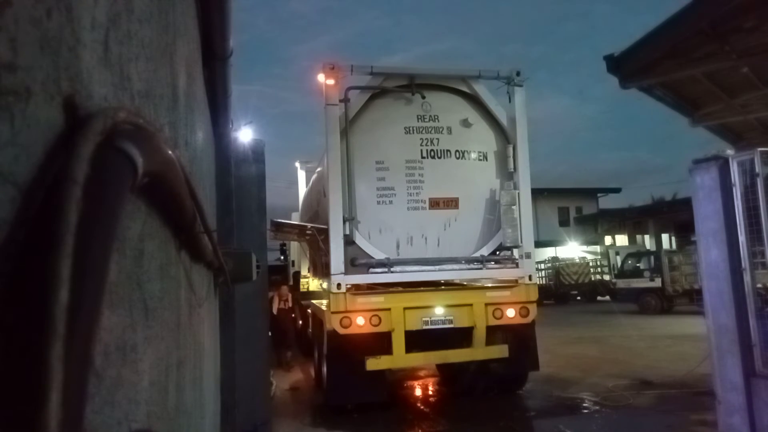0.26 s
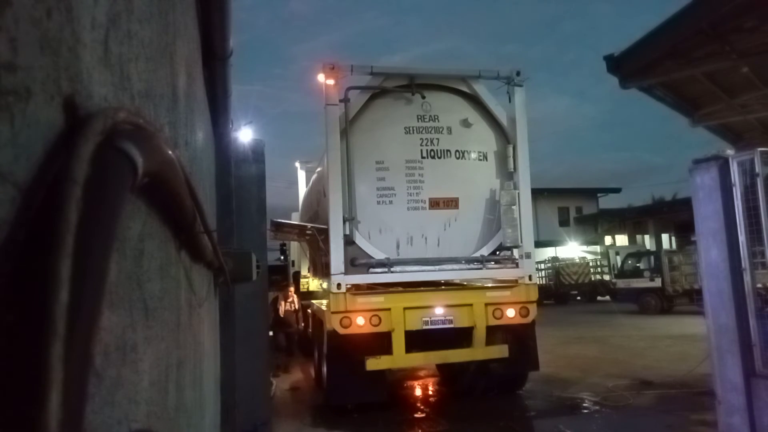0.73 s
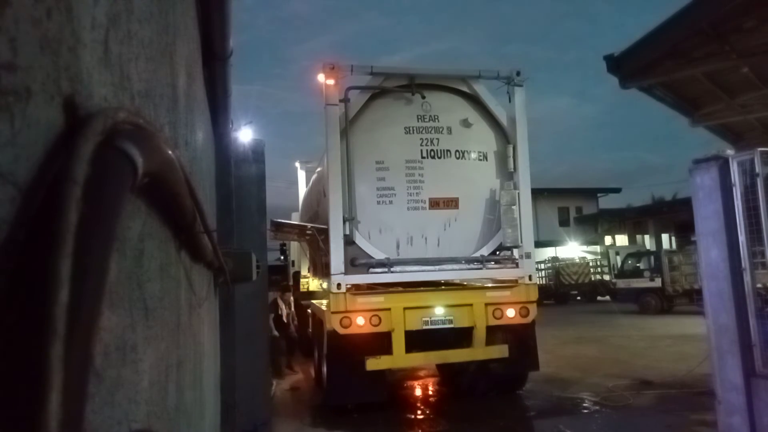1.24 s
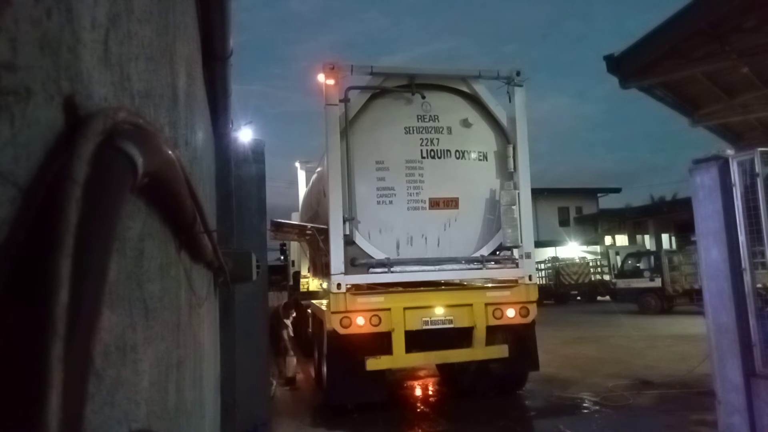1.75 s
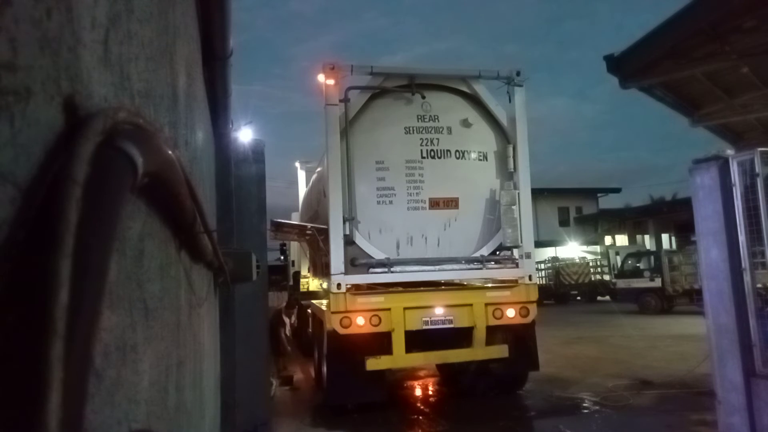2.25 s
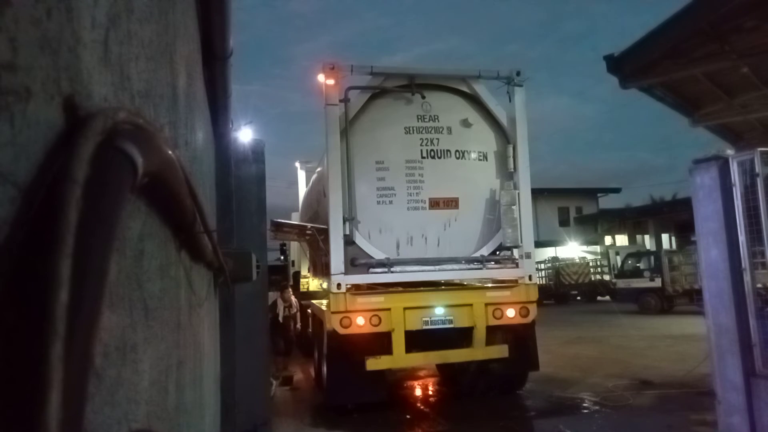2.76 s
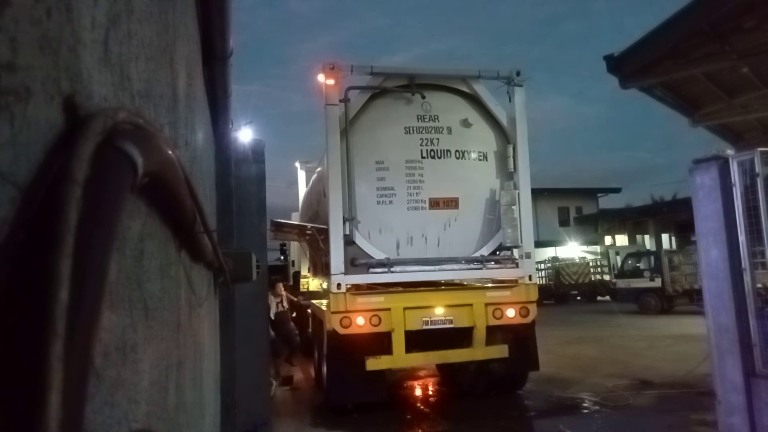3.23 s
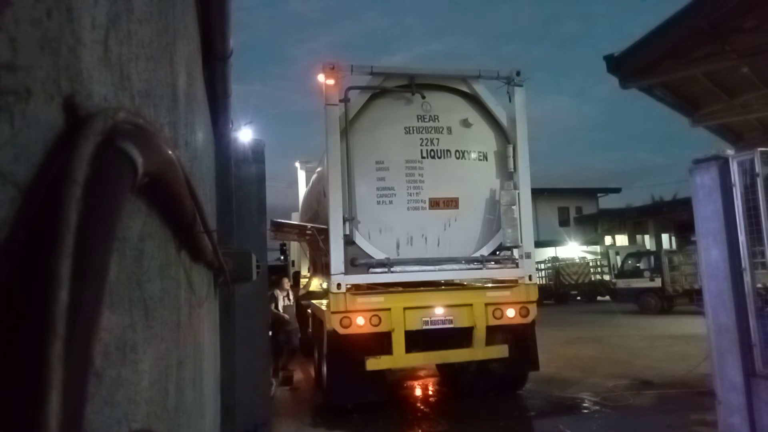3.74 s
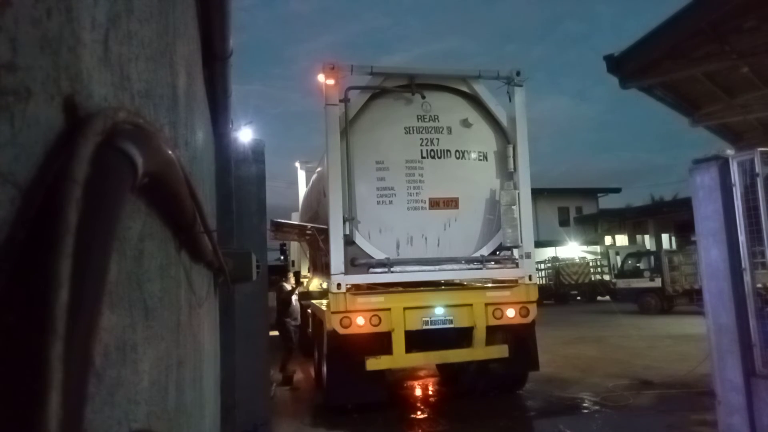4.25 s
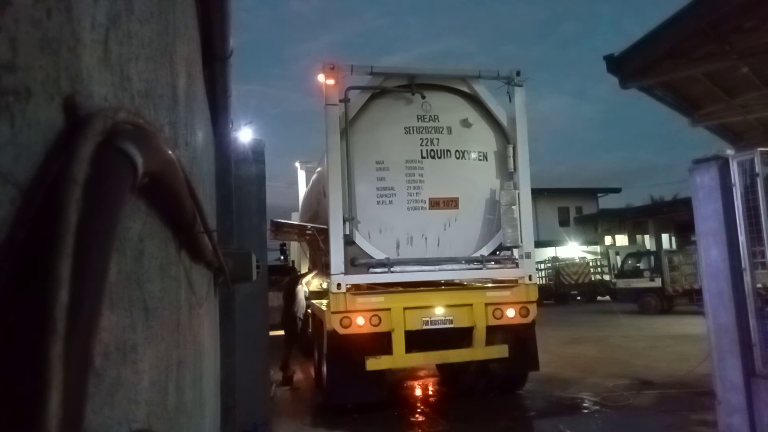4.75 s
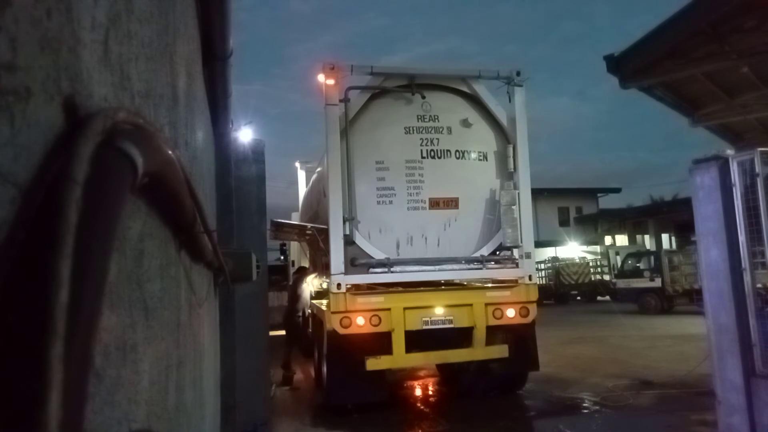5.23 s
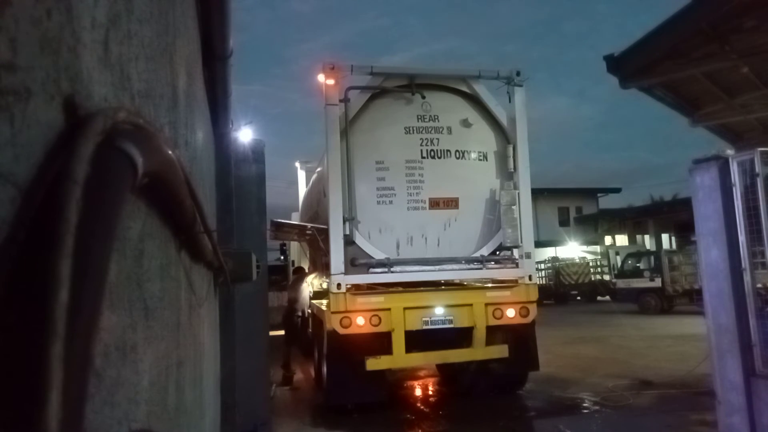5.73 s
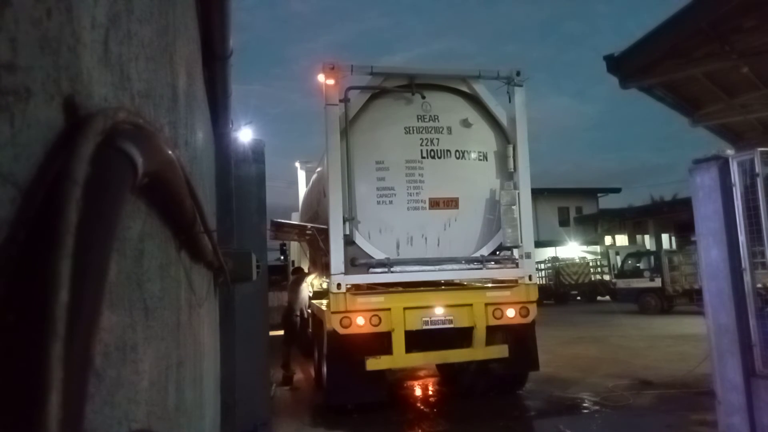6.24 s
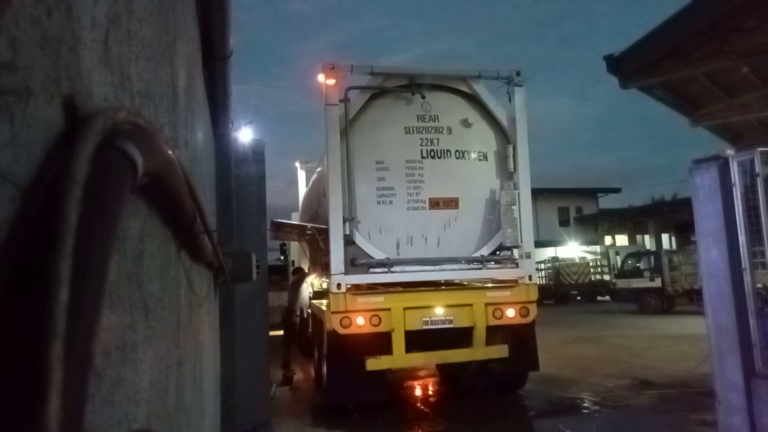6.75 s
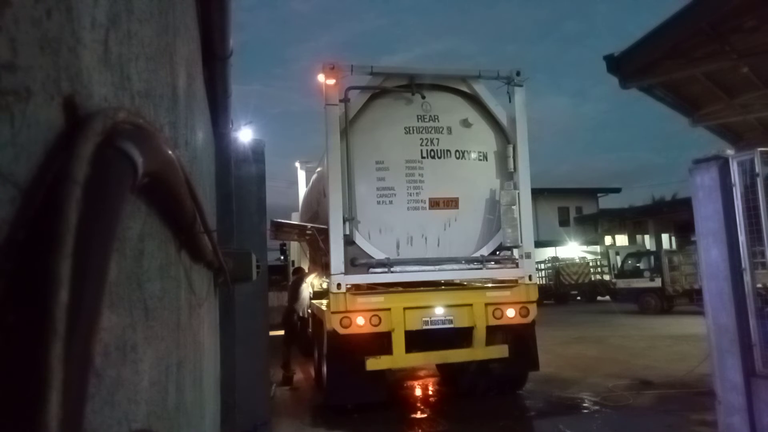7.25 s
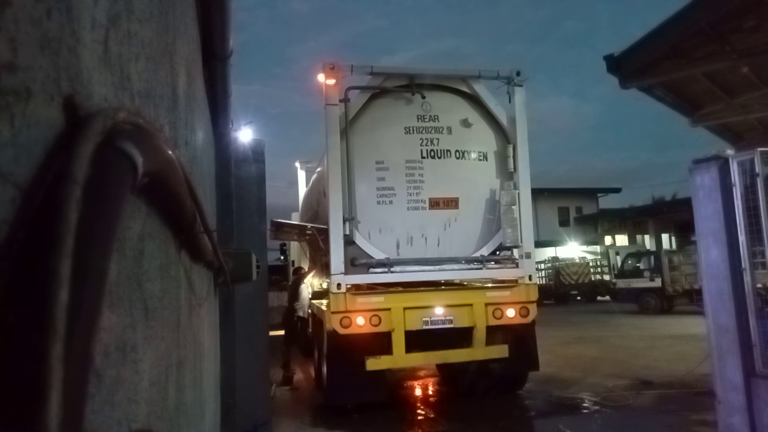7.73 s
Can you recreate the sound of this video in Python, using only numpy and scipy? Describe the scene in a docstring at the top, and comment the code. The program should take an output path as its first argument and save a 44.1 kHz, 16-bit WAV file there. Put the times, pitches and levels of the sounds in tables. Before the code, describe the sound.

A quiet industrial yard: distant machines give a low, slightly wavering hum with faint steady tones, soft airy wash and one thin, high fan whine. At about 1.75 s a dull double knock lands on a heavy panel, boxy and rattling; a stronger, brighter cluster follows at 2.35 to 2.5 s. Near 3.3 s comes a small, bright metal clink, and at 3.75 s a very faint low bump. The hum continues alone until 5.46 s, when a valve chirps, a stuttering high squeak rising within a tenth of a second. Immediately loud gas hisses out, with hollow pipe resonances, a sinking breathy note and a whistling edge. At 6.0 s the tones thin. Around 6.6 s a thud brings a lumpy, swelling low rumble beneath the hiss. At 7.1 s the rumble collapses and a broad, full roar holds until the end, with short yard echo.

```python
"""Tank vent in a machine yard

Distant machines hum, as coloured noise, wavering tones and noise-driven resonances, with one far fan.
Dull knocks ring a heavy panel's modes through a rattle, and a metal fitting clinks as crack and ring.
A valve then squeaks open on a rising note, and noise hisses through resonances of pipe and valve seat.
As the valve opens in steps, the hiss gives way to a broad roar over a thud and a lumpy low rumble.
"""
import sys
import numpy as np
from scipy import signal
from scipy.fft import rfft, irfft, next_fast_len
from scipy.io import wavfile

SR = 44100
rng = np.random.default_rng(int(sys.argv[2]) if len(sys.argv) > 2 else 0)


def file_out(sig):
    """Save sig as 16-bit WAV at sys.argv[1]."""
    # one column per channel
    cols = np.atleast_2d(sig).T
    # limit, then scale
    lim = np.clip(cols, -1, 1)
    pcm = np.round(lim * 32767).astype(np.int16)
    wavfile.write(sys.argv[1], SR, pcm)


N = 352359
T = np.arange(N) / SR  # the time of every sample, in seconds

# The yard's wash. Each row: frequency in Hz, relative density in dB per Hz.
YARD_SPECTRUM = [(15, -63), (25, -47.5), (98, 1), (162, -9), (207, -4), (231, -15.5), (307, -12.5),
                 (418, -14.5), (621, -18.5), (663, -16.5), (922, -14), (1280, -22.5), (3450, -26),
                 (3770, -28.5), (4800, -44.5), (6240, -78), (10600, -120)]
# The yard's high air. Each row: frequency in Hz, relative density in dB per Hz.
AIR_SPECTRUM = [(4000, -36), (5100, -22.5), (5650, -9), (6200, -14), (7250, 1), (8300, -11), (9400, -15),
                (10300, -9), (11500, -18), (15000, -11)]
YARD_DB, AIR_DB = -39.5, -57
# The machines' steady tones. Each row: pitch in Hz, level in dB before the common hum level.
HUM_TONES = [(91.5, -54.5), (199, -54), (312, -55), (624.5, -54.5), (861, -61), (1087, -53.5),
             (1217, -58.5), (2428, -65), (3666, -67), (3698, -60), (4420, -73), (7226, -68.5), (7880, -73),
             (8320, -78)]
# Fans and ducts around the yard. Each row: pitch in Hz and width in Hz before the common factors,
# relative density in dB.
WHINE_MODES = [(378, 24, 2), (894, 73, -1.5), (1094, 27, -1), (1675, 340, -4.5), (2480, 85, -4),
               (2660, 86, -1.5), (3114, 88, -5), (4434, 87, -13), (7060, 60, -25), (7680, 60, -17),
               (10300, 70, -26)]
# The most piercing fan.
FAN_HZ, FAN_DB = 3730, -64.5

# Blows on a heavy panel. Each row: start in seconds, first peak in dB before the band limit,
# brightness of the first contact in Hz, change per rebound in dB.
KNOCKS = [(1.754, -9.5, 252, -6.5), (1.803, -20, 230, -10), (2.352, -7.5, 460, -18),
          (2.369, -7.5, 700, -5.5), (2.456, -19.5, 680, -6.5), (2.52, -26, 450, -3), (3.743, -30, 110, -12),
          (3.776, -26, 110, -18)]
# The panel's modes. Each row: pitch in Hz, relative level in dB, time to fall 60 dB in seconds.
PANEL_MODES = [(120.8, -15, 0.25), (148.3, -3.5, 0.18), (195, -1, 0.063), (211, 5, 0.059), (263, -6, 0.091),
               (350, -1.5, 0.05), (440, -4, 0.1), (500, -6, 0.16), (620, -9.5, 0.13), (750, -12, 0.11),
               (867, -14, 0.11), (1360, -19, 0.082), (1550, -19, 0.086)]
# The panel chatters after a blow: seconds between rebounds, brightness factor per rebound.
REBOUND_S, REBOUND_BRIGHTER = 0.0162, 1.1

# A metal fitting clinks. The row: start in seconds, overall gain in dB.
CLINK = (3.282, -33)
# The fitting's modes. Each row: pitch in Hz, relative level in dB, time to fall 60 dB in seconds.
FITTING_MODES = [(2330, -11, .25), (2568, -2, .45), (2620, 0.5, .41), (2720, -5, .35), (2955, -10, 0.55),
                 (3470, -11, 0.2), (6720, -8, .22), (6790, -7, 0.35), (8450, -14, 0.2), (9390, -13, .2),
                 (13600, -21, .15)]
# The crack of its contact. Each row: frequency in Hz, relative density in dB per Hz.
CRACK_SPECTRUM = [(1200, -32), (2400, 4), (3600, -4), (5000, -24), (6700, -6), (9000, -22), (11500, -27),
                  (14000, -22)]

# The valve squeaks as it cracks open. Each row: start in seconds, length in seconds,
# level in dB before flutter and reflections.
SQUEAKS = [(5.464, .004, -32), (5.476, 0.0069, -17.5), (5.491, 0.015, -22.5), (5.516, 0.076, -23)]
SQUEAK_ATTACK_S, SQUEAK_RELEASE_S = 0.0016, 0.0052
# The pitch climbs exponentially; the last value is the time constant.
SQUEAK_FROM_HZ, SQUEAK_TO_HZ, SQUEAK_CLIMB_S = 2830, 3220, 0.0222

# The valve opens in steps. Each row: start in seconds, time the step takes in seconds, flow in dB,
# trend of the flow in dB per second, pipe ringing in dB, seat whistle in dB, share of roar from 0 to 1.
STEPS = [(5.49, 0.11, -14.5, -2, -3.5, -0.5, 0.01), (6.02, .06, -13, 1.5, -14, -4.5, 0.03),
         (6.56, 0.09, -15, -1.5, -23, -14, 0.18), (7.13, 0.076, -13.4, -2, -13.5, -14, 0.99)]
# Trend of the pipe ringing and of the seat whistle after each step.
PIPE_SETTLE_DB_PER_S, SEAT_SETTLE_DB_PER_S = -5, -13
# The narrow jet. Each row: frequency in Hz, relative density in dB per Hz.
HISS_SPECTRUM = [(70, -48), (210, -10), (340, -17), (480, -6.5), (1300, -11.5), (1950, 1), (2220, -0.5),
                 (3100, 0.5), (4000, -6), (4900, -17), (5900, -16), (7250, -1.5), (8300, -13.5),
                 (10500, -21), (13000, -19.5), (15200, -14)]
# The wide jet. Each row: frequency in Hz, relative density in dB per Hz.
ROAR_SPECTRUM = [(40, -30), (140, -1.5), (1000, -1), (2200, -0.5), (3200, -0.5), (4000, -8), (4900, -21.5),
                 (6000, -19.5), (7250, -8), (8300, -16.5), (10500, -21.5), (13000, -20.5), (15200, -15)]
# The vent pipe's resonances. Each row: pitch in Hz before chilling, width in Hz before widening,
# relative density in dB.
PIPE_MODES = [(224, 33, -2.5), (509, 62, -4.5), (761, 31, -0.5), (975, 53, 3), (1196, 46, 1.5),
              (1424, 91, 2.5), (1706, 50, 2), (2040, 46, -0.5)]
# The valve seat's resonances. Each row: pitch in Hz, width in Hz before widening, relative density in dB.
SEAT_MODES = [(1727, 30, -17), (2513, 27, -4), (2545, 72, -4), (2858, 49, -6.5), (3030, 40, -9.5),
              (3210, 48, -10.5), (3746, 20, -11), (3800, 40, -13.5), (4110, 23, -13.5), (7170, 25, -11),
              (7260, 32, -11.5), (7460, 35, -15)]
# Cold gas chills the pipe: time constant in seconds, pitch factors when warm and when cold.
CHILL_S, PIPE_WARM, PIPE_COLD = 0.29, 1.02, 0.96
# The pipe's strongest note: pitch warm and cold, level, build-up, change of level at the second step.
HOWL_WARM_HZ, HOWL_COLD_HZ, HOWL_DB, HOWL_BUILD_S, HOWL_DROP_DB = 511, 412, -23, 0.32, -19

# The plume's eddies. Each row: frequency in Hz, relative density in dB per Hz.
EDDY_SPECTRUM = [(25, -44), (60, -13), (110, -0.5), (240, 0.5), (420, -1.5), (900, -5), (1450, -9.5),
                 (3000, -29.5)]
# Start, collapse, attack and release of the rumble.
PLUME_S, COLLAPSE_S, PLUME_ATTACK_S, PLUME_RELEASE_S = 6.58, 7.13, 0.045, 0.26
# First level, swell, level after the collapse.
PLUME_DB, PLUME_SWELL_DB_PER_S, PLUME_LATE_DB = -17.5, 5, -28
# The plume bursts out with a thud. The row: start in seconds, level in dB.
THUD = (6.607, -8)

# Ground, wall and tank reflect the vent. Each row: delay in seconds, level in dB against the direct sound.
REFLECTIONS = [(.0043, -30), (0.0118, -19), (0.0194, -19.5), (.031, -21)]
# The yard's echo. Each row: frequency in Hz, time to fall 60 dB in seconds.
ECHO_DECAY = [(100, 0.52), (400, 0.57), (1000, 0.96), (3000, 0.6), (8000, 0.47), (15000, 0.52)]
EDGE_HZ = 15560  # upper band limit


def gain_of(db):
    """Decibels to an amplitude factor."""
    return 10 ** (np.asarray(db) / 20)


def evened(x):
    """Scales to rms 1."""
    return x / np.sqrt(np.mean(x ** 2) + 1e-20)


def read(points, hz):
    """Reads a table of values over frequency, interpolating on a log-frequency axis."""
    f, value = np.transpose(points)
    return np.interp(np.log(hz + 1), np.log(f + 1), value)


def add(mix, s, sound):
    """Lays a sound into the mix at time s, cut off at the mix's end."""
    part = mix[round(s * SR):][:len(sound)]
    part += sound[:len(part)]


def ramp(start_s, length_s):
    """Rises from 0 to 1 over the given time, then holds."""
    return np.clip((T - start_s) / length_s, 0, 1)


def since(s):
    """Seconds gone by since time s; zero before it."""
    return np.maximum(T - s, 0)


def noise(spectrum, above_hz=0):
    """Coloured noise whose part over above_hz has rms 1."""
    size = next_fast_len(N)
    hz = np.fft.rfftfreq(size, 1 / SR)
    coloured = rfft(rng.standard_normal(size)) * gain_of(read(spectrum, hz))
    reference = irfft(coloured * (hz >= above_hz), size)
    return irfft(coloured, size)[:N] / np.std(reference)


def drift(rate_hz):
    """Slow chance of rms 1: sines of random phase at rates up to the given one."""
    t = T[::64]
    waves = 0
    for f in np.geomspace(rate_hz / 16, rate_hz, 32):
        waves = waves + np.sin(2 * np.pi * (f * t + rng.random())) / f ** 0.25
    return np.interp(T, t, evened(waves))


def resonate(x, hz, width):
    """A resonance of gain 1 that follows the curve hz, with the steep skirts of a double pole."""
    turn = np.exp(2j * np.pi * np.cumsum(hz * np.ones(N)) / SR)
    r = np.exp(-np.pi * width / SR)
    # shift the resonance down to 0 Hz, smooth there, shift back up
    smooth = signal.lfilter([(1 - r) ** 2], [1, -2 * r, r * r], x / turn)
    return 2 * (turn * smooth).real


def blown(modes, pitch, widen):
    """Turbulence excites a set of resonances, all bent by one pitch factor; the sum has rms 1."""
    total = 0
    for hz, width, db in modes:
        mode = evened(resonate(rng.standard_normal(N), hz * pitch, width * widen))
        total = total + gain_of(db) * np.sqrt(width) * mode
    return evened(total)


def ring(modes, t):
    """Struck modes, each dying at its own speed."""
    return sum(gain_of(db - 60 * t / t60) * np.sin(2 * np.pi * hz * t) for hz, db, t60 in modes)


def echo(x, build_s):
    """Scattered reflections from walls and tanks build up, then die band by band."""
    t = np.arange(SR) / SR
    hits = rng.standard_normal(SR) * (rng.random(SR) < 3000 / SR)  # about 3000 per second
    taps = hits * (1 - np.exp(-t / build_s))
    hz, s, bands = signal.stft(taps, SR, nperseg=256)
    bands = bands * gain_of(-60 * s / read(ECHO_DECAY, hz)[:, None])
    tail = signal.istft(bands, SR, nperseg=256)[1]
    return signal.fftconvolve(x, tail / np.linalg.norm(tail))[:N]


def reflected(x):
    """Single early reflections comb the sound; the total power stays the same."""
    out = x.copy()
    for delay, db in REFLECTIONS:
        add(out, delay, gain_of(db) * x)
    return out * np.std(x) / np.std(out)


def yard(rumble_hz=102, rumble_width_hz=50, rumble_db=-46, hum_db=-3, whine_db=-49,
         waver_hz=2.53, swell_db=0.35, flicker_db=2.5):
    """Distant machines: a wash, a low throb, wavering tones and whining fans."""
    wash = gain_of(YARD_DB + swell_db * drift(6.8)) * noise(YARD_SPECTRUM)
    air = gain_of(AIR_DB) * noise(AIR_SPECTRUM)
    rumble = evened(resonate(rng.standard_normal(N), rumble_hz, rumble_width_hz))
    tones = 0
    for hz, db in HUM_TONES:
        level = gain_of(db + flicker_db * drift(5.6))
        phase = 2 * np.pi * np.cumsum(hz + waver_hz * drift(9)) / SR
        tones = tones + level * np.sin(phase)
    hum = gain_of(hum_db) * np.sqrt(2) * tones
    whine = gain_of(whine_db) * blown(WHINE_MODES, 0.98, widen=1.26)
    return wash + air + gain_of(rumble_db) * rumble + hum + whine


def fan(width_hz=42, swell_db=3, swell_hz=2.44):
    """One far fan whines as a narrow band of noise, swelling and sinking at random."""
    whine = evened(resonate(rng.standard_normal(N), FAN_HZ, width_hz))
    return gain_of(FAN_DB + swell_db * drift(swell_hz)) * whine


def knocks(rattle_db=8, rattle_t60=0.28, wet_db=-7, lowest_hz=88, highest_hz=1900, swell_s=0.0032, count=4):
    """Each blow rings and rattles the panel, then rebounds weaker and brighter; dull contact mutes high modes."""
    t, out = np.arange(SR // 2) / SR, np.zeros(N)
    # the thick panel radiates neither deep bass nor treble
    radiate = signal.butter(3, [lowest_hz, highest_hz], "band", fs=SR, output="sos")
    for s, db, bright_hz, rebound_db in KNOCKS:
        for k in range(count):
            rattle = gain_of(rattle_db - 60 * t / rattle_t60) * rng.standard_normal(len(t))
            motion = (ring(PANEL_MODES, t) + rattle) * (1 - np.exp(-t / swell_s))
            contact = signal.butter(3, bright_hz * REBOUND_BRIGHTER ** k, fs=SR, output="sos")
            blow = signal.sosfilt(radiate, signal.sosfilt(contact, motion))
            add(out, s + k * REBOUND_S, gain_of(db + k * rebound_db) * blow / abs(blow).max())
    return out + gain_of(wet_db) * echo(out, 0.011)


def clink(crack_db=-1, crack_t60=0.21, wet_db=-3):
    """Metal on metal: a bright crack of noise and a short ring of the fitting's modes."""
    t, out = np.arange(SR // 2) / SR, np.zeros(N)
    start_s, db = CLINK
    crack = gain_of(crack_db - 60 * t / crack_t60) * noise(CRACK_SPECTRUM)[:len(t)]
    add(out, start_s, gain_of(db) * (crack + 0.55 * ring(FITTING_MODES, t)))
    return out + gain_of(wet_db) * echo(out, 0.01)


def squeak(jitter_hz=110, flutter_db=3, wet_db=-5):
    """The first gas through the gap sings a rising, stuttering note."""
    climb = np.exp(-since(SQUEAKS[0][0]) / SQUEAK_CLIMB_S)
    hz = SQUEAK_TO_HZ + (SQUEAK_FROM_HZ - SQUEAK_TO_HZ) * climb
    phase = 2 * np.pi * np.cumsum(hz + jitter_hz * drift(500)) / SR
    level = 0
    for s, length, db in SQUEAKS:
        release = np.exp(-since(s + length) / SQUEAK_RELEASE_S)
        level = level + gain_of(db) * ramp(s, SQUEAK_ATTACK_S) * release
    tone = np.sin(phase) + gain_of(-32) * np.sin(2 * phase)  # with a faint octave
    note = np.sqrt(2) * level * gain_of(flutter_db * drift(260)) * tone
    return reflected(note) + gain_of(wet_db) * echo(note, 0.004)


def warmth():
    """1 while the pipe is warm, sinking to 0 once cold gas flows."""
    return np.exp(-since(STEPS[0][0]) / CHILL_S)


def valve():
    """Flow, pipe ringing, seat whistle (dB) and share of roar: each step glides to a setting with its own trend."""
    state = None
    for s, glide_s, flow_db, trend, pipe_db, seat_db, share in STEPS:
        age = since(s)
        setting = np.array([
            flow_db + trend * age,
            pipe_db + PIPE_SETTLE_DB_PER_S * age,
            seat_db + SEAT_SETTLE_DB_PER_S * age,
            np.full(N, share)])
        state = setting if state is None else state + (setting - state) * ramp(s, glide_s)
    return state


def jet(broad_db=-1, flutter_db=0.15, surge_db=0.59):
    """The narrow hiss with its pipe and seat tones gives way to a wide roar."""
    flow_db, pipe_db, seat_db, share = valve()
    chill = PIPE_COLD + (PIPE_WARM - PIPE_COLD) * warmth()
    share = np.clip(share, 0, 1)
    hiss = np.sqrt(1 - share) * noise(HISS_SPECTRUM, 1500)
    roar = np.sqrt(share) * noise(ROAR_SPECTRUM, 1500)
    pipe = gain_of(pipe_db) * blown(PIPE_MODES, chill, widen=1.95)
    seat = gain_of(seat_db) * blown(SEAT_MODES, 1, widen=1.7)
    opened = ramp(*STEPS[0][:2])
    turbulence = gain_of(flutter_db * drift(120) + surge_db * drift(13))
    return opened * gain_of(flow_db) * turbulence * (gain_of(broad_db) * (hiss + roar) + pipe + seat)


def howl(width_hz=56):
    """A breathy pipe note builds up and sinks as the pipe chills; step two weakens it, step three ends it."""
    first, second, third = STEPS[:3]
    hz = HOWL_COLD_HZ + (HOWL_WARM_HZ - HOWL_COLD_HZ) * warmth()
    weakened = gain_of(HOWL_DB + HOWL_DROP_DB * ramp(*second[:2]))
    level = ramp(first[0], HOWL_BUILD_S) * weakened * (1 - ramp(*third[:2]))
    return level * evened(resonate(rng.standard_normal(N), hz, width_hz))


def buffet(lump_db=0.7, thud_hz=135, thud_s=0.0052):
    """The wide plume bursts out, then sheds big eddies: a lumpy low rumble that swells and collapses."""
    swelling_db = PLUME_DB + PLUME_SWELL_DB_PER_S * since(PLUME_S)
    db = swelling_db + (PLUME_LATE_DB - swelling_db) * ramp(COLLAPSE_S, PLUME_RELEASE_S)
    out = ramp(PLUME_S, PLUME_ATTACK_S) * gain_of(db + lump_db * drift(60)) * noise(EDDY_SPECTRUM)
    t = np.arange(SR // 4) / SR
    start_s, level_db = THUD
    pulse = t / thud_s * np.exp(1 - t / thud_s)  # peaks at 1 after thud_s
    add(out, start_s, gain_of(level_db) * pulse * np.sin(2 * np.pi * thud_hz * t))
    return out


def scene(vent_wet_db=-11):
    """The vent, with early reflections on its jet and the yard's echo, joins the yard and the small sounds."""
    vent = reflected(jet()) + howl()
    vent_echo = gain_of(vent_wet_db) * echo(vent, 0.0013)
    small_sounds = knocks() + clink() + squeak()
    return (yard() + fan() + small_sounds + vent + vent_echo + buffet())[None]


def record(dry):
    """The one microphone's signal: peaks round off under full scale, then a steep low-pass at EDGE_HZ."""
    knee, room = 0.62, 0.3  # of full scale: where rounding starts, and how far above it peaks can reach
    over = np.maximum(abs(dry) - knee, 0)
    rounded = np.clip(dry, -knee, knee) + np.sign(dry) * room * np.tanh(over / room)
    low_pass = signal.firwin(1023, EDGE_HZ, window=("kaiser", 9), fs=SR)
    return signal.oaconvolve(rounded, low_pass[None], "same")


dry = scene()
out = record(dry)
file_out(out)
```